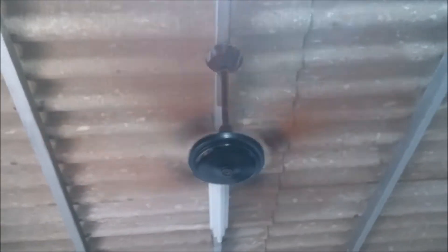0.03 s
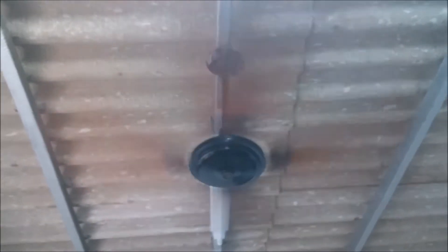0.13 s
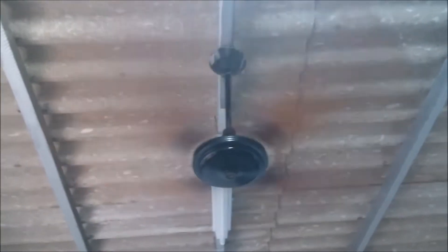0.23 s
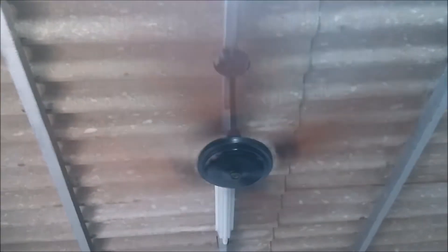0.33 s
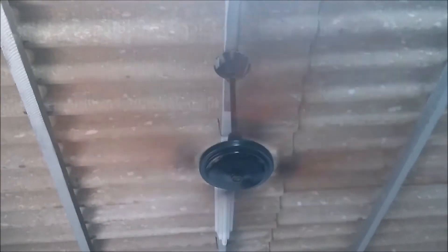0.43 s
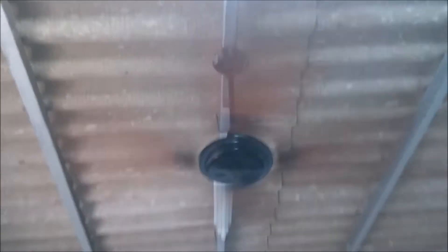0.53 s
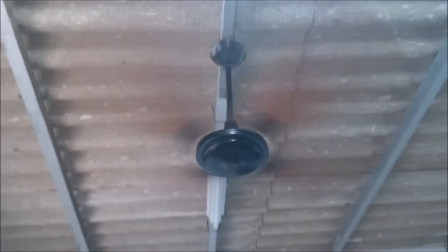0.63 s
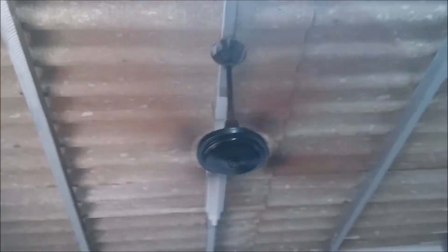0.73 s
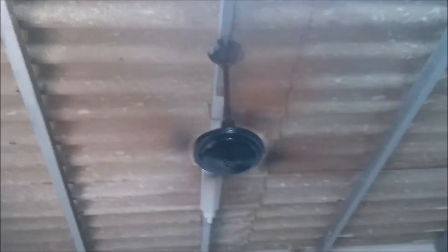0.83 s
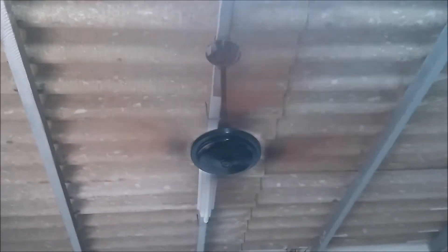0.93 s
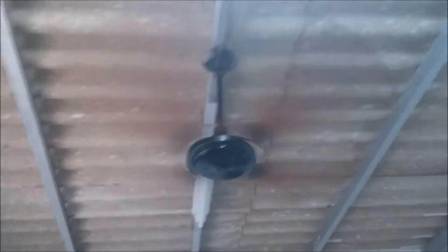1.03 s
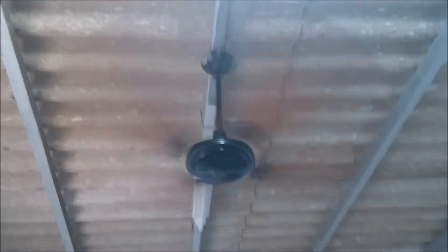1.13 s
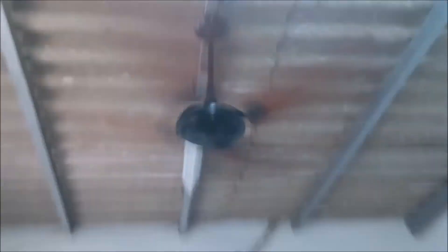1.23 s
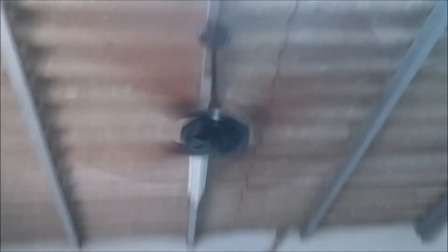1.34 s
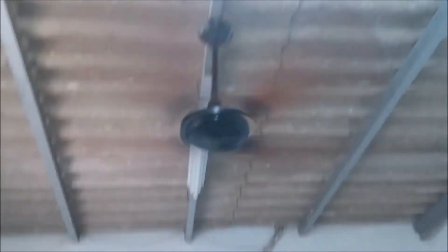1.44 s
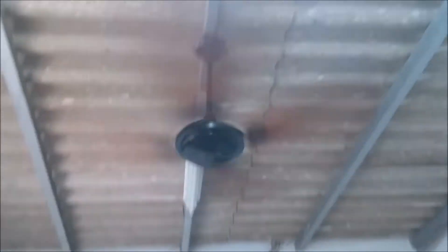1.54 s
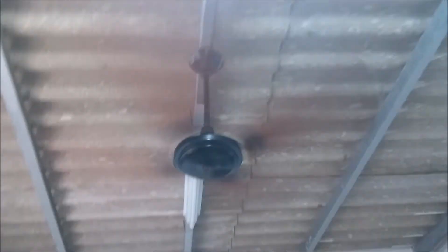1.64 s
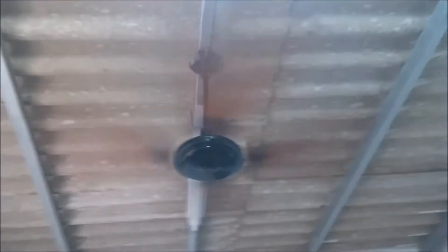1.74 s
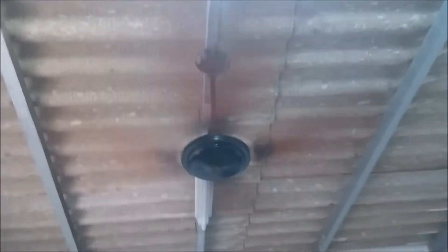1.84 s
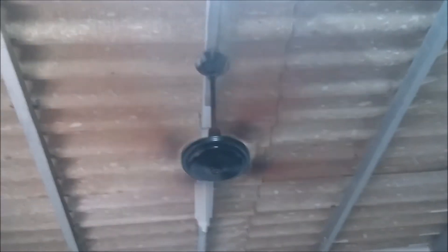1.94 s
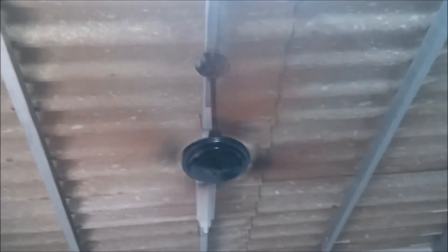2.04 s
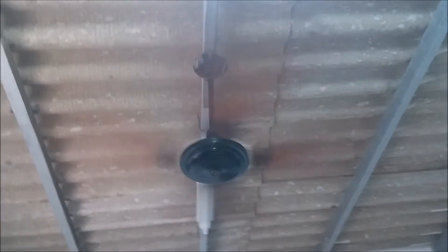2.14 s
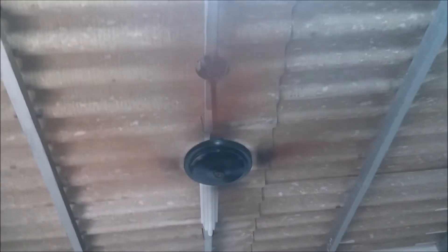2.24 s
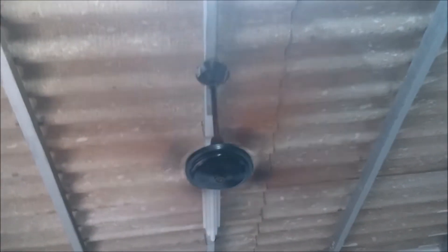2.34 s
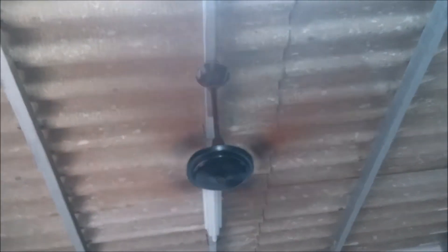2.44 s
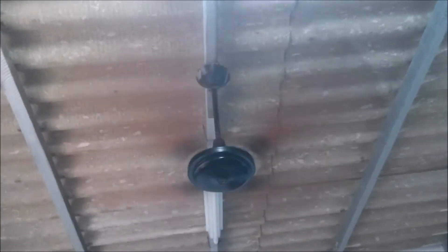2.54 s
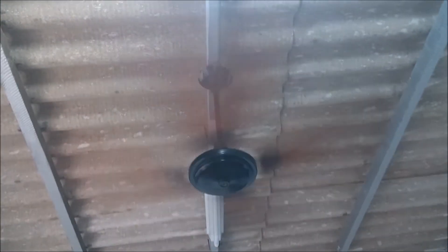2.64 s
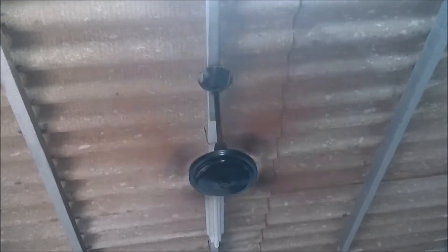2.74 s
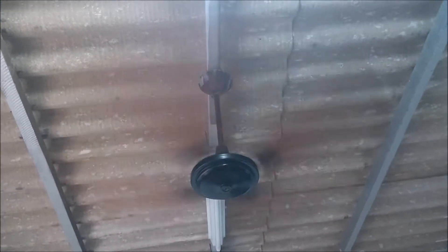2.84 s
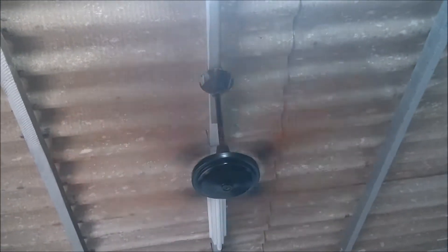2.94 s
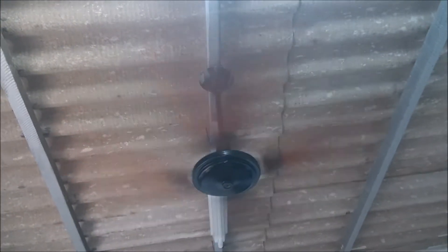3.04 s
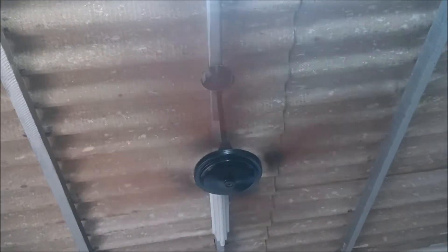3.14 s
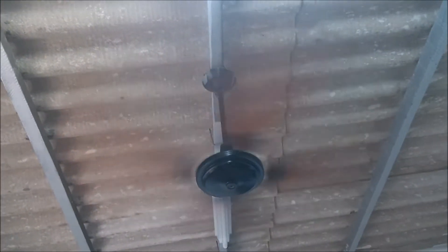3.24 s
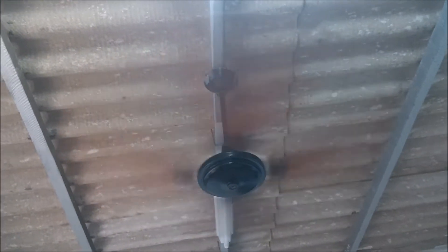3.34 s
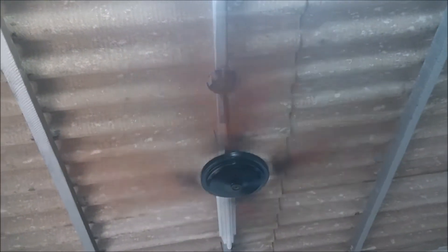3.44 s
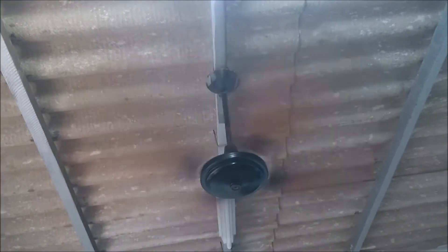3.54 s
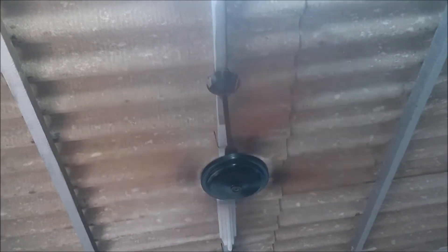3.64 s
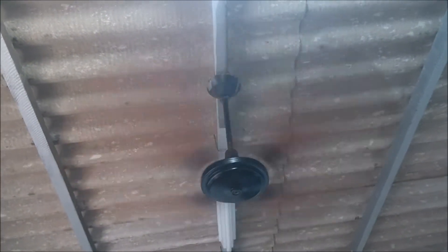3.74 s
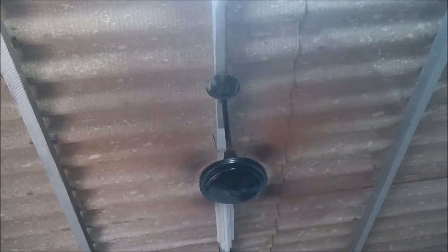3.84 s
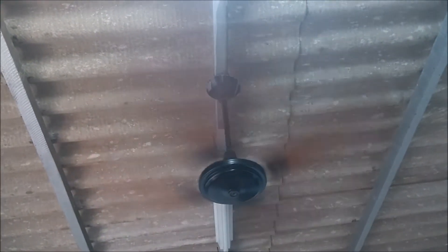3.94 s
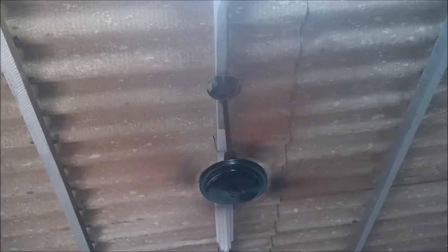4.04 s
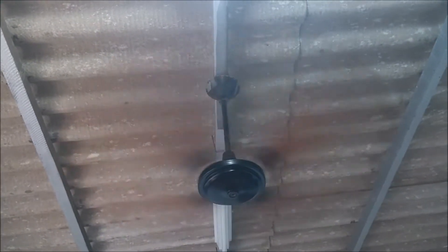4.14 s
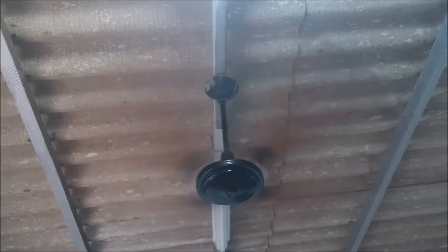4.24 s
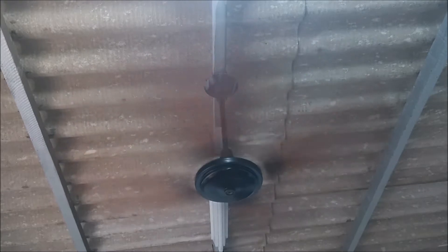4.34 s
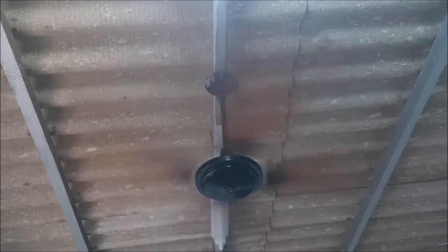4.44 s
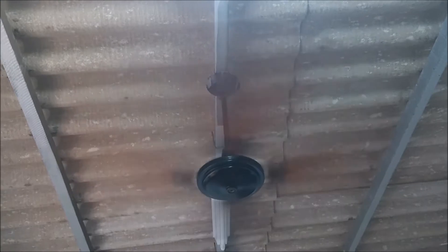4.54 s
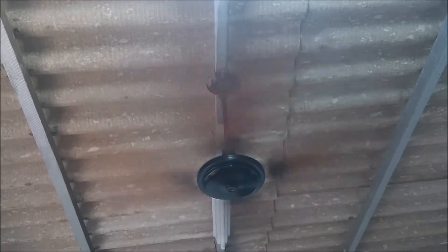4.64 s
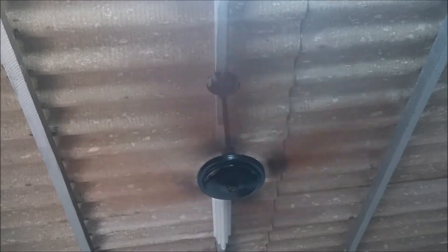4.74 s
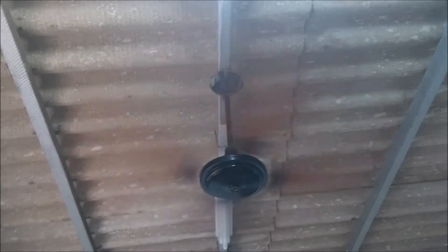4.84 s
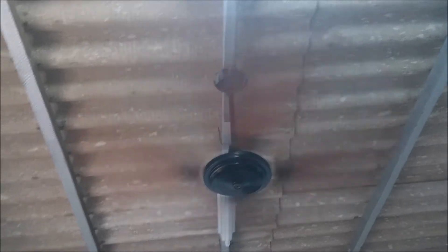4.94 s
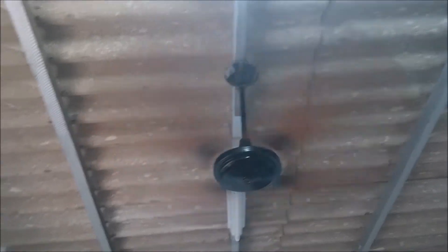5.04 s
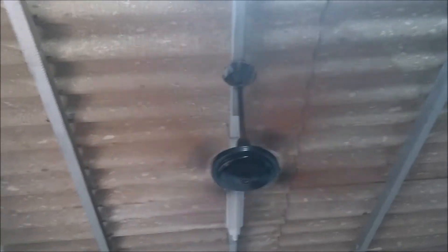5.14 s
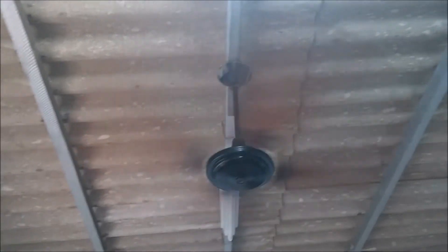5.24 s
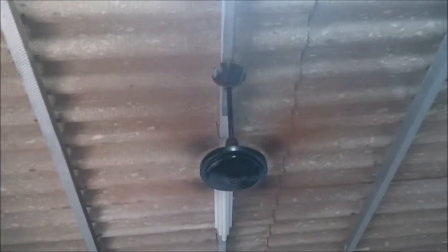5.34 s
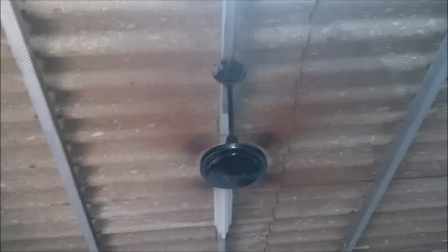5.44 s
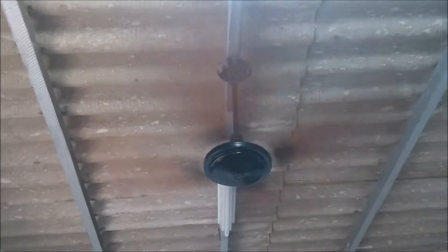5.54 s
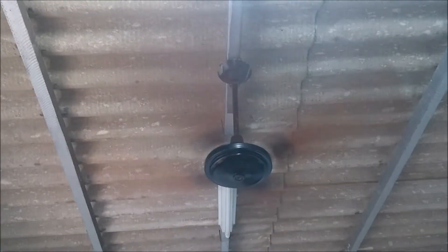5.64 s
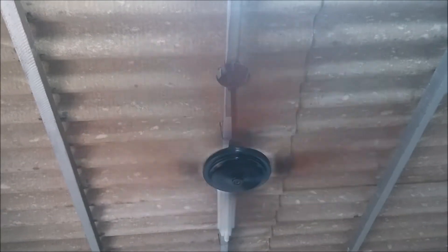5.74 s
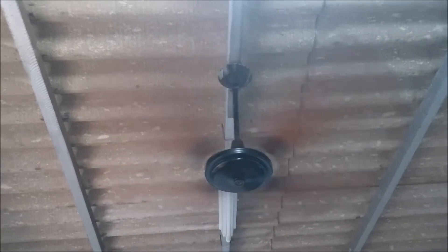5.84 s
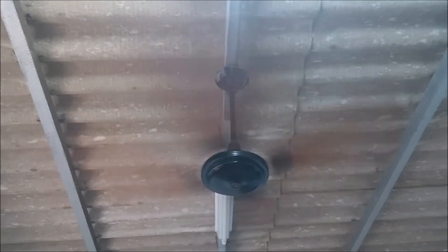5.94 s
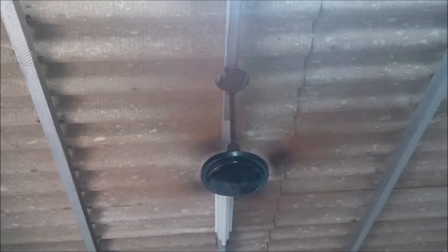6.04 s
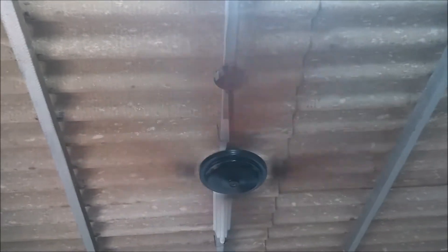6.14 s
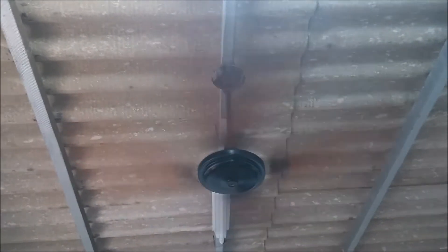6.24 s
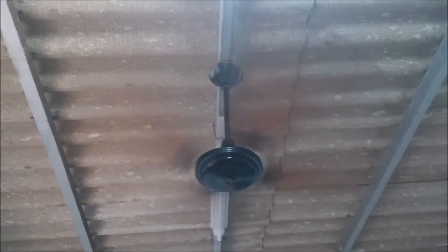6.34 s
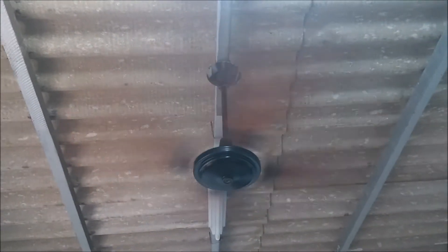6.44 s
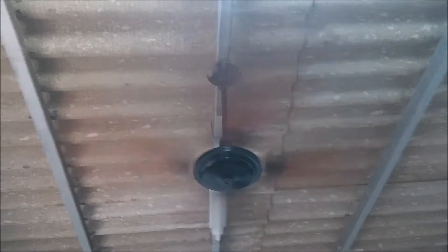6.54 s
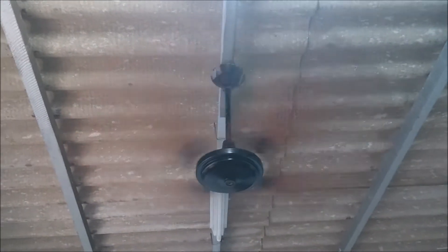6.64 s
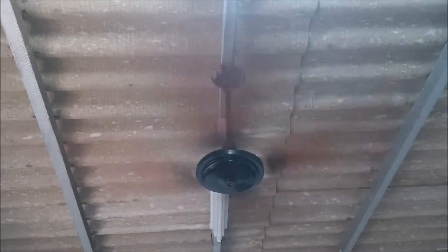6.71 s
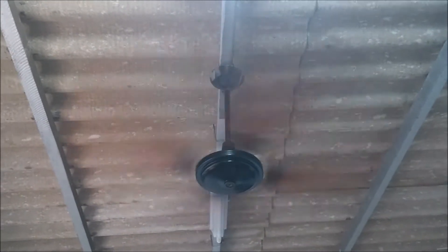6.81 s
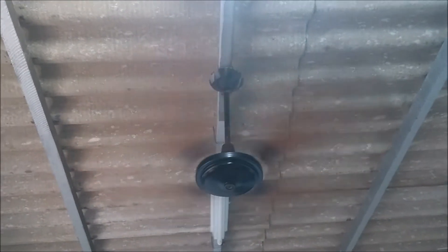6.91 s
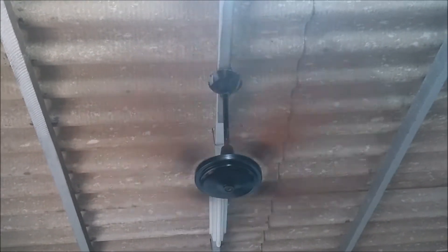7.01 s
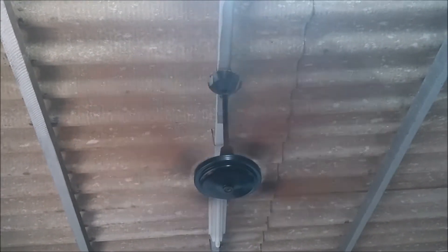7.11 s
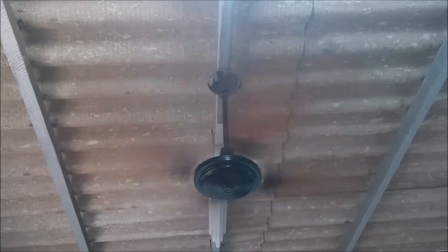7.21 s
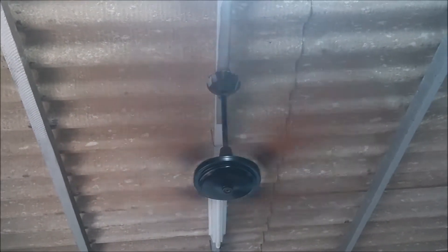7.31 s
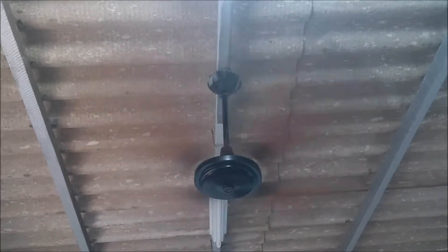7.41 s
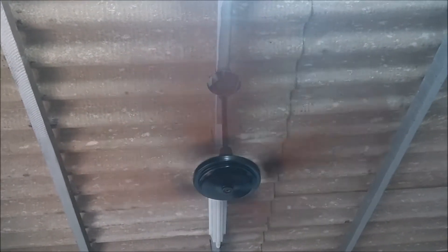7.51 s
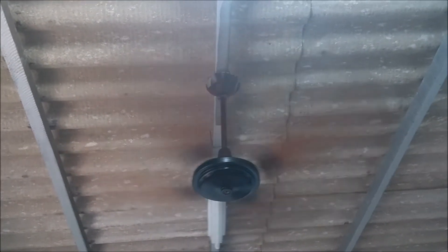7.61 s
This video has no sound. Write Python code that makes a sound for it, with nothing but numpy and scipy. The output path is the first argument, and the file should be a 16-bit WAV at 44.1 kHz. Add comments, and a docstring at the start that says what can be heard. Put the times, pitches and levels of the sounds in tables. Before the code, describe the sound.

Low motor hum and dull air wash from a spinning ceiling fan, gently swelling and sinking. One crisp snap to the right with a short room tail comes early, followed by close ticks, drags and a low thump as the handheld device is regripped. Faint brushing strokes follow, then a quiet stretch of fan alone, then a run of gritty high swishes with tiny ticks before the fan is left humming.

```python
"""Ceiling fan, snap and swish

An old ceiling fan hums under a sheet roof: sine tones at mains ripple and shaft orders, over a noise rush of air.
A dry snap excites a few resonances and a decaying room tail; fingers click, drag and bump on the phone's case.
A thin swish brushes past in strokes: shaped gritty noise, with grains ringing in two high resonances.
The phone widens its two ports by subtracting each, delayed, from the other."""
import sys
import numpy as np
from scipy import signal
from scipy.fft import rfft, irfft, next_fast_len
from scipy.io import wavfile
from scipy.ndimage import uniform_filter1d, map_coordinates

SR = 44100
rng = np.random.default_rng(int(sys.argv[2]) if len(sys.argv) > 2 else 0)


def dump(signal):
    """Clip the signal to [-1, 1] and save it as 16-bit WAV at the path in sys.argv[1]."""
    limited = np.clip(np.atleast_2d(signal).T, -1, 1)
    pcm = np.round(limited * 32767).astype(np.int16)
    wavfile.write(sys.argv[1], SR, pcm)


N = 338247


def amp(db):
    """Decibels to gain."""
    return 10 ** (np.asarray(db) / 20)


def along(points, hz):
    """Interpolates (f/Hz, value) points on a log frequency axis."""
    f, value = np.transpose(points)
    return np.interp(np.log(hz + 1), np.log(f + 1), value)


def wobble(rate):
    """A smooth random curve with `rate` knots a second."""
    knots = rng.standard_normal(int(N * rate / SR) + 4)
    return map_coordinates(knots, [np.arange(N) * rate / SR])


def filtered(x, response):
    """x shaped by a complex response of frequency, padded so that its tail does not wrap round."""
    m = next_fast_len(N + SR // 2)
    return irfft(rfft(x, m) * response(np.fft.rfftfreq(m, 1 / SR)), m)[..., :N]


def modes(table):
    """Causal response of a few resonances, neighbours in the table in opposite polarity."""
    def response(f):
        total = 0
        for k, (center, width, db) in enumerate(table):
            resonance = 1j * f * width / (center * center - f * f + 1j * f * width)
            total = total + (-1) ** k * amp(db) * resonance
        return total
    return response


def patchy(patchy_db):
    """Two white noises sharing time-frequency patches of random gain."""
    z = signal.stft(rng.standard_normal((2, N)), nperseg=512)[2]
    field = uniform_filter1d(rng.standard_normal(z.shape[1:]), 6, 0)
    field = uniform_filter1d(field, 12, 1)
    return signal.istft(z * amp(patchy_db * field / field.std()), nperseg=512)[1][:, :N]


def ports(common, opposed):
    """Left and right port from what they share and what they oppose."""
    return np.array([common + opposed, common - opposed])


def rush(spectrum, patchy_db):
    """Stereo noise from (f/Hz, common level/dB per Hz, opposed level/dB per Hz) points."""
    hz, common_db, opposed_db = np.transpose(spectrum)

    def gain(f):
        density_db = [along(np.c_[hz, db], f) for db in (common_db, opposed_db)]
        return np.sqrt(SR / 2) * amp(density_db) * (f > 25)
    return ports(*filtered(patchy(patchy_db), gain))


def add(track, s, sound, pan_db):
    """Lays a sound into both ports at s seconds; a positive pan turns the right port down."""
    gains = amp([[min(pan_db, 0)], [min(-pan_db, 0)]])
    track[:, round(s * SR):][:, :sound.shape[-1]] += gains * sound


# the fan and the room swell and sink together: t/s, level/dB
ROOM_LEVEL = [(0.0, -52), (0.21, -50), (0.68, -48.5), (0.9, -47), (1.15, -47.5), (1.4, -48.5), (2.07, -48),
              (2.63, -49.5), (2.95, -52.5), (3.63, -53), (4.98, -53.5), (5.72, -48), (7.13, -52),
              (7.67, -53.5)]


def room_level_db():
    """The shared swell of the background, in dB at every sample."""
    return np.interp(np.arange(N) / SR, *np.transpose(ROOM_LEVEL))


RIPPLE_HZ, SHAFT_HZ = 120.07, 3.295
SHAFT_START, SIDEBAND_LAG = .9, 1.8  # rad: rotor angle at the start; lag of the shaft-shifted tones
# motor tones, before the room level: ripple multiple, shaft multiple, level common to both ports/dB,
# opposed level/dB, lead of the opposed part/rad
MOTOR_TONES = [(0, 15, -23, -43, 0), (0, 17, -15, -29, .2), (0, 18, -25, -52, 0), (0, 19, -18, -38, -.5),
               (0, 54, -20, -56, 0), (0, 56, -19, -41, 0), (0, 84, -21, -45, 1.1), (1, -1, -13, -39, -1.6),
               (1, 0, 0, -20, -1.3), (1, 1, -8, -32, -2.2), (1, 2, -20, -56, 0), (2, -1, -19, -35, -.6),
               (2, 0, 2, -26, .8), (2, 1, -22, -46, -2.8), (3, 0, -21, -29, -1.6), (5, -1, -23, -40, .2),
               (5, 0, -31, -36, 1.4), (5, 1, -30, -40, -1.6), (6, 0, -32, -47, .3), (8, 0, -31, -33, -1.6),
               (10, 0, -40, -40, 2.1), (10, 2, -36, -45, 1.4), (11, 0, -34, -27, -1.7)]


def hum(hum_db=0.17):
    """Magnetic ripple, with sidebands whole turns of the shaft apart, and bare shaft orders."""
    out, t = np.zeros((2, N)), np.arange(N) / SR
    start = 2 * np.pi * rng.random(size=12)  # one phase per ripple multiple
    rotor = 2 * np.pi * SHAFT_HZ * t + SHAFT_START
    for ripple, turns, common_db, opposed_db, lead in MOTOR_TONES:
        phase = 2 * np.pi * ripple * RIPPLE_HZ * t + start[ripple]
        phase = phase + turns * rotor - SIDEBAND_LAG * (turns != 0)
        tone = ports(amp(common_db) * np.sin(phase), amp(opposed_db) * np.sin(phase + lead))
        out += np.sqrt(2) * amp(hum_db) * tone  # root two: the levels are RMS
    return out


REGRIP_S, REGRIP_FADE_S = 1.33, .03  # the hand has opened by this time; length of the fade


def cupped():
    """1 while the hand cups the phone, then a short fade to 0."""
    return np.clip((REGRIP_S - np.arange(N) / SR) / REGRIP_FADE_S, 0, 1)


# rush of air, before the room level: f/Hz, common level/dB per Hz, opposed level/dB per Hz
AIR_RUSH = [(30.4, -45, -37), (43, -29, -53), (55.6, -21, -33), (72.4, -30, -40), (105, -23, -39),
            (140, -23, -41), (152, -17.5, -38), (171, -27, -39.5), (189, -23.5, -39.5), (207, -25.5, -39),
            (275, -25.5, -44), (291, -31.5, -40.5), (298, -24.5, -42), (319, -30, -40.5),
            (428, -37.5, -44.5), (552, -35, -44), (745, -42, -48.5), (1340, -48.5, -44),
            (1840, -48.5, -46.5), (2110, -59, -54.5), (2380, -86, -52), (2570, -50.5, -56),
            (3110, -55.5, -55.5), (4700, -60, -59), (7950, -58, -59), (10000, -62, -62), (14200, -62, -64)]
# air ringing in the cupped hand, before the room level: f/Hz, common level/dB per Hz, opposed level/dB per Hz
CUP_RINGING = [(880, -68, -72), (1470, -47.5, -47), (1740, -45, -40), (2300, -50.5, -54), (3000, -54, -60),
               (4500, -66, -67)]


def air():
    """Turbulence from the blades: alike at both ports in the bass, unrelated in the treble; at first it
    also rings in the hand."""
    return rush(AIR_RUSH, patchy_db=1.6) + cupped() * rush(CUP_RINGING, patchy_db=2.5)


# lead-in and blow: t/s, strength level/dB
SNAP_BLOWS = [(.4620, -4), (0.4674, 9.5)]
# resonances of the snap: f/Hz, width/Hz, relative level/dB
SNAP_RESONANCES = [(996, 270, 1.5), (1920, 990, 1.5), (2670, 1270, -2), (5900, 5200, -22), (1692, 50, 3.5),
                   (575, 360, -7), (1077, 38, -7)]
# how long the room rings: f/Hz, t60/s
ROOM_DECAY = [(500, 0.29), (1320, 0.49), (3480, 0.51), (9190, 0.46)]
FAR_PORT_S = .00037  # the snap reaches the left port late


def snap():
    """A dry snap off to the right, then the room's answer, each frequency dying at its own speed."""
    blows = np.zeros(N)
    for s, db in SNAP_BLOWS:
        blows[round(s * SR)] = amp(db)
    # a gentle high-pass at 700 Hz thins the resonances
    around = filtered(blows, lambda f: modes(SNAP_RESONANCES)(f) * 1j * f / (700 + 1j * f))
    direct = filtered(around, modes([(1750, 490, 12.8)]))  # the straight path favours one band
    hz, t, z = signal.stft(rng.standard_normal((2, SR // 2)), SR, nperseg=256)
    decay = amp(-60 * t / along(ROOM_DECAY, hz)[:, None])
    tail = signal.istft(z * decay, SR, nperseg=256)[1]
    tail = tail / np.linalg.norm(tail[0])
    delayed = np.pad(around, (90, 0))[None]  # the room answers 90 samples late
    room = signal.fftconvolve(delayed, tail, axes=1)[:, :N]
    direct_pair = np.array([np.roll(direct, round(FAR_PORT_S * SR)), direct])
    return direct_pair * amp([[-13], [.7]]) + amp([[3], [5]]) * room


# finger contacts on the case: t/s, knock level/dB, contact time constant/ms, crackle level/dB, left over right/dB
FINGER_CLICKS = [(1.0270, 11, 0.085, -28, 27), (1.2359, 9.5, 0.21, -30, -10),
                 (1.2365, 10.5, 0.012, -34, 13), (1.23735, 13.5, 0.14, -25, 27), (1.274, -6, 0.05, -34, 8),
                 (1.2764, 10, 0.2, -29, 18), (1.2846, -1, 0.06, -34, -14)]
# a finger drags raggedly over the case: middle t/s, spread (one sigma)/s, push level/dB, crackle level/dB,
# left over right/dB
FINGER_DRAGS = [(1.2048, .001, -46, -47, -7), (1.2117, .001, -44, -42, 1), (1.2425, .002, -34, -52, 6),
                (1.2567, .0015, -43, -40, -5), (1.265, .008, -47, -56, 3), (1.273, .0025, -33, -40, 3),
                (1.2848, .0012, -33, -40, -5), (1.292, .004, -44, -50, 3), (1.2969, .0009, -46, -32, 0)]
# the case is jolted: t/s, level/dB, f/Hz, left over right/dB
CASE_JOLTS = [(0.478, -28, 125, 0), (0.505, -20.5, 200, -2), (0.689, -25, 80, 17), (1.027, -26, 220, 10),
              (1.2395, -28, 110, 10), (1.272, -32, 169, -11), (1.288, -7.5, 98, -35)]
# the whole phone shoved, then its case: f/Hz, width/Hz, relative level/dB
CASE_RESONANCES = [(70, 2270, -3.5), (780, 850, 5.5), (3200, 600, -4)]
# colour of the crackle: f/Hz, width/Hz, relative level/dB
CRACKLE_RESONANCES = [(4670, 11000, 2), (12400, 2400, 2)]
CRACKLE_S, DRAG_GRAIN_DB = 0.005, 4  # t60 of the crackle after a click; unevenness of a drag


def handling():
    """Contacts push the case into its modes, duller the longer they last, with brief crackle; a jolt is
    a damped low swing."""
    pushes, jolts, crackle = np.zeros((3, 2, N))
    t = np.arange(SR // 8) / SR
    puff = amp(-60 * t / CRACKLE_S)
    for s, db, contact_ms, crackle_db, pan_db in FINGER_CLICKS:
        force = t * np.exp(-t * 1000 / contact_ms)
        add(pushes, s, amp(db) * force / force.sum(), pan_db)
        add(crackle, s, amp(crackle_db) * puff * rng.standard_normal((2, len(t))), pan_db)
    for s, width, db, crackle_db, pan_db in FINGER_DRAGS:
        start = s - 3 * width
        press = amp(DRAG_GRAIN_DB * wobble(1400)[:len(t)]) * np.exp(-.5 * (t / width - 3) ** 2)
        add(pushes, start, amp(db) * press * rng.standard_normal(len(t)), pan_db)
        add(crackle, start, amp(crackle_db) * press * rng.standard_normal((2, len(t))), pan_db)
    for s, db, hz, pan_db in CASE_JOLTS:
        rise = 1 - np.exp(-3 * hz * t)
        decay = amp(db - 21 * hz * t)  # loses 21 dB a cycle
        add(jolts, s, -decay * rise * np.sin(2 * np.pi * hz * t), pan_db)
    knocks = filtered(pushes, modes(CASE_RESONANCES))
    return jolts - knocks + filtered(crackle, modes(CRACKLE_RESONANCES))


# strokes: t/s, level/dB, rise time constant/s, hold/s, upper ring over lower/dB
SWISH_STROKES = [(0.45, -58.5, .005, 0.031, 6), (0.96, -48, 0.037, 0.038, 3), (1.226, -55.5, 0.01, 0.07, 7),
                 (1.494, -71, .02, 0.092, 0), (1.8, -65, .04, 0.13, 0), (2.017, -58, .003, 0.021, 7),
                 (2.055, -62, 0.006, 0.095, 12), (2.21, -64, .015, 0.079, 4), (4.703, -69, .004, 0.027, 0),
                 (5.159, -54.5, 0.024, 0.053, 8), (5.402, -47.5, 0.025, 0.05, -7),
                 (5.524, -68, .01, 0.022, 0), (5.663, -54, 0.0054, 0.056, 20), (5.777, -67, .005, 0.022, 6),
                 (5.831, -60, .004, 0.017, 3), (5.936, -54.5, 0.0087, 0.052, -15),
                 (6.176, -50, 0.0094, 0.045, -7), (6.408, -49, 0.0074, 0.041, 0),
                 (6.713, -69, .02, 0.056, 0), (7.005, -70, 0.018, 0.057, 0)]
# a stroke catches: t/s, level/dB
STROKE_CATCHES = [(5.1946, -56), (5.4336, -51), (5.4512, -30), (5.4565, -49), (5.683, -55), (5.8436, -55),
                  (5.96, -46), (6.1906, -46), (6.1995, -53), (2.086, -58), (2.157, -58), (6.222, -49),
                  (6.245, -51), (6.4133, -55), (6.4324, -52)]
# colour of the hiss: f/Hz, relative level/dB
HISS_TONE = [(5000, -33), (7500, -7), (9500, -4.5), (11000, 1.5), (13000, -1), (14400, -4)]
# colour of the lower scrape: f/Hz, relative level/dB
LOW_SCRAPE_TONE = [(1500, -52), (3000, 0), (5000, -4), (8000, -0.5), (11000, -4)]
# grains ring in two resonances, lower then upper: f/Hz, width/Hz, level against the stroke/dB
GRAIN_RINGS = [(10830, 750, -5), (12300, 2200, -7)]
STEADY_DB, WANDER_DB = -20.5, 1.5  # steady hiss against the room level; its slow wander
RELEASE = 3.4  # t60 of a stroke over its hold
LINGER_DB, LINGER = -24, 11  # its faint after-hiss: level against the stroke, t60 over the hold
TICK_S = 0.0036  # t60 of a catch
SWISH_ALIKE = 0.14  # the opposed part of the friction is turned down by this share
GRAINS_PER_S, GRAIN_SPREAD_DB = 3000, 2.5


def stroke_shapes(t):
    """(start/s, envelope, upper ring over lower/dB) of each catch and stroke: soft rise, fall, after-hiss."""
    shapes = [(s, amp(db - 60 * t / TICK_S), 0) for s, db in STROKE_CATCHES]
    for s, db, rise, hold, lean_db in SWISH_STROKES:
        after = np.maximum(t / hold - 1, 0)  # holds elapsed since the end of the hold
        fall = amp(-60 * after / RELEASE) + amp(LINGER_DB - 60 * after / LINGER)
        shapes.append((s, amp(db) * fall * (1 - np.exp(-t / rise)) ** 2, lean_db))
    return shapes


def swish(firm_db=-48, scrape_db=-58):
    """Fine, gritty friction, louder at the right port: hiss and a lower scrape follow each stroke, and
    sparse grains ring in two resonances."""
    level = amp(room_level_db() + STEADY_DB + WANDER_DB * wobble(3.07))
    low, high = np.zeros((2, N))
    t = np.arange(SR) / SR
    for s, shape, lean_db in stroke_shapes(t):
        start = round(s * SR)
        for track, gain in ((level, 1), (low, amp(-lean_db / 2)), (high, amp(lean_db / 2))):
            track[start:][:len(t)] += gain * shape[:N - start]
    common, opposed = patchy(patchy_db=3.0) * amp(0.74 * wobble(900))
    grit = ports(common, (1 - SWISH_ALIKE) * opposed)
    hiss = filtered(grit, lambda f: amp(along(HISS_TONE, f)))
    scrape = filtered(grit, lambda f: amp(along(LOW_SCRAPE_TONE, f)))
    # the scrape grows a little less than the hiss as a stroke gets louder
    scrape_level = amp(scrape_db) * (level / amp(firm_db)) ** 0.86
    out = level * hiss / hiss.std() + scrape_level * scrape / scrape.std()
    for (hz, width, db), stroke in zip(GRAIN_RINGS, (low, high)):
        struck = rng.random(N) < GRAINS_PER_S / SR
        grains = amp(GRAIN_SPREAD_DB * rng.exponential(size=N)) * struck * grit
        drive = amp(db) * stroke * grains / grains.std()
        # each resonance is passed twice, with make-up gain for its narrow band
        out += filtered(drive, lambda f: modes([(hz, width, 0)])(f) ** 2 * np.sqrt(SR / width / 2))
    return amp([[-2.2], [2.2]]) * out


def scene():
    """All sources as the two ports receive them."""
    fan = amp(room_level_db()) * (hum() + air())
    return fan + snap() + handling() + swish()


# sensitivity of the right port over the left: f/Hz, level/dB
RIGHT_PORT_EXTRA = [(1000, 0), (1500, 3), (2200, 1), (5000, 7), (9000, 0.5), (14000, 2.5)]
# share of the other port subtracted, hand open: f/Hz, share
CROSSFEED_OPEN = [(5500, 0.86), (8000, 0.11)]
# share of the other port subtracted while the hand cups the phone: f/Hz, share
CROSSFEED_IN_HAND = [(1200, 0.84), (2300, 0.6), (3500, 0.63), (5500, 0.8), (8000, 0.14)]
PORT_LAG_S, TOP_HZ = .000424, 14280  # delay of the subtracted port; band limit


def crossfeed(heard, share):
    """The opposite port, late and scaled by its share at each frequency."""
    def response(f):
        return np.clip(along(share, f), 0, 1) * np.exp(-2j * np.pi * f * PORT_LAG_S)
    return filtered(heard[::-1], response)


def record(dry):
    """Each channel is its port minus a late share of the other; nothing above the band limit."""
    heard = filtered(dry, lambda f: amp(along(RIGHT_PORT_EXTRA, f) * [[-.5], [.5]]))
    open_hand = crossfeed(heard, CROSSFEED_OPEN)
    in_hand = crossfeed(heard, CROSSFEED_IN_HAND)
    widened = heard - cupped() * in_hand - (1 - cupped()) * open_hand
    return filtered(widened, lambda f: f < TOP_HZ)


dry = scene()
out = record(dry)
dump(out)
```